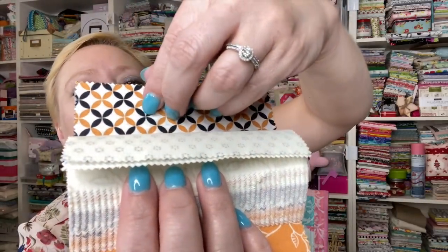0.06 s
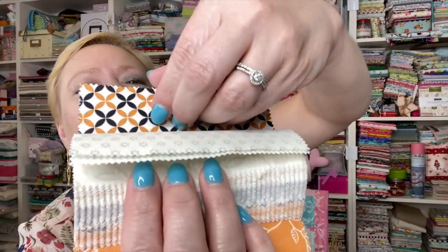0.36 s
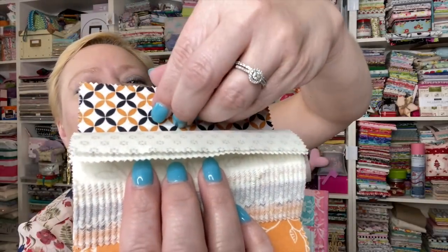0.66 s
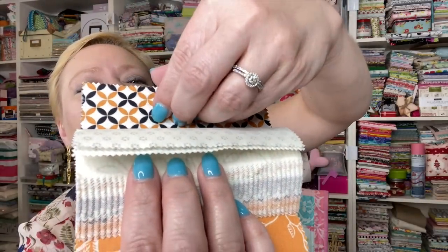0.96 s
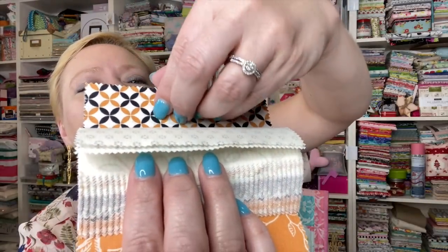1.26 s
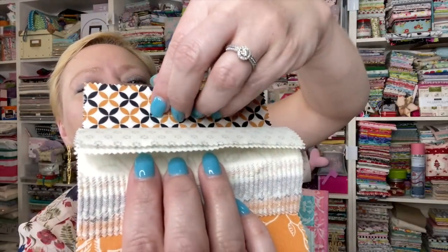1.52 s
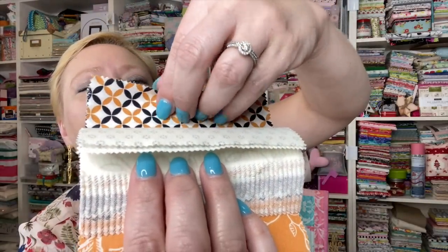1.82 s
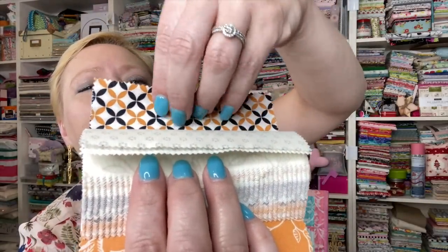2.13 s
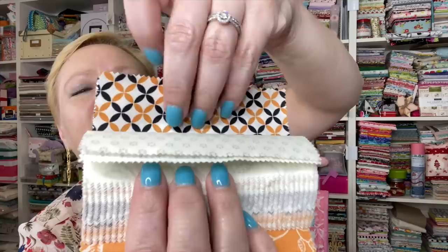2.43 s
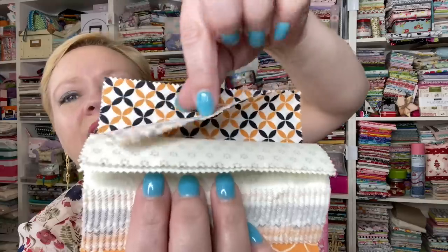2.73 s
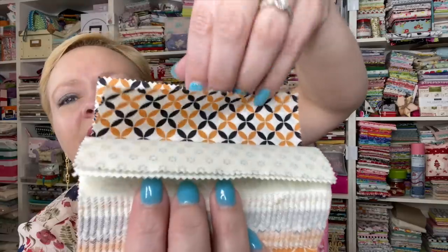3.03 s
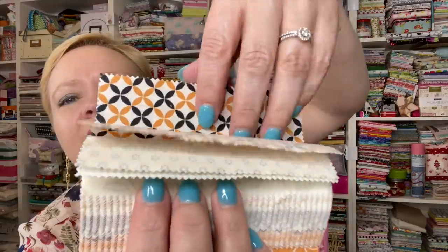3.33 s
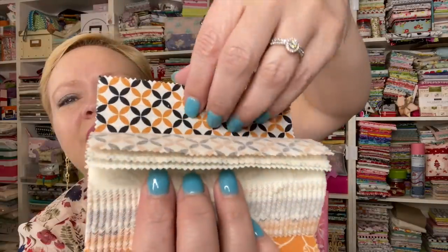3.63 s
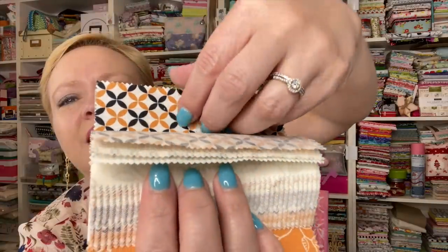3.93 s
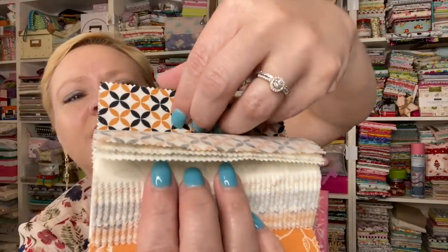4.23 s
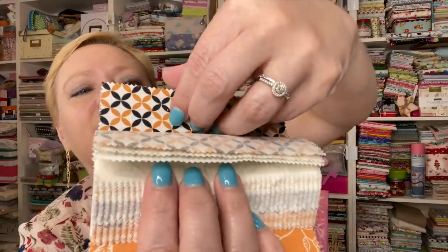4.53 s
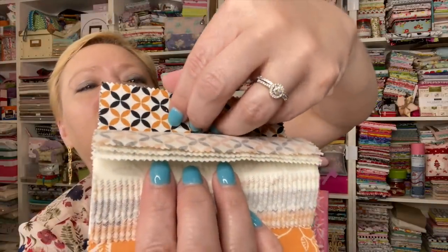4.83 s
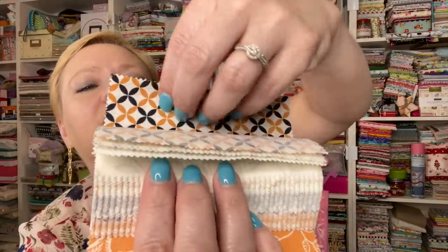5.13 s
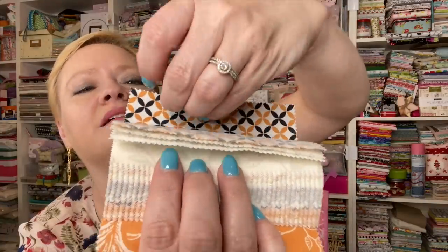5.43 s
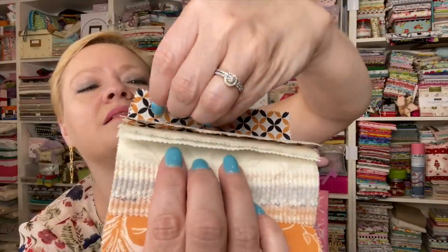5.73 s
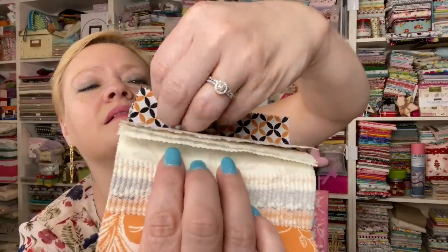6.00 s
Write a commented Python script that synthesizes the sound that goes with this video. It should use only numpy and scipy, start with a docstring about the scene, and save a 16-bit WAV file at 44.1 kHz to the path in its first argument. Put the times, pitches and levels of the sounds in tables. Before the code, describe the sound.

A small, dead-sounding room carries soft air noise, a low rumble, household machine hum, a fan throbbing about twice a second and a faint drone that slowly sinks in pitch. A soft, deep bump comes at about 0.4 seconds. Close to the stereo microphone and a little to the right, fingertips brush faintly over cotton squares, with a tiny tick at 1.6 seconds. From 2 seconds the strokes grow busier, mixing dull rubbing, bright hiss and light swishes. At about 3.2 seconds one square is folded over with the fullest swish and flops down softly. At 3.6 seconds a fingernail snaps off the edge of the stack, short and sharp, with a few soft taps. The cloth goes nearly still, apart from a thin tick at 4.8 seconds. Hissy brushes return around 5.2 to 5.4 seconds, and lighter rustles follow from 5.9 seconds to the end, just past 6.

```python
"""A small room padded with shelves of cloth, where cotton squares are leafed off a stack in close stereo.
Fingertips drag over the weave, and countless slipping threads make a dull rub, a bright hiss and a swish.
Edges catch and tick, one square is folded over and flops down, and a fingernail snaps off the stack's edge.
Underneath lie room air, rumble, one deep bump, the hum of household machines, a throbbing fan
and a faint drone that slowly sinks in pitch."""
import sys
import numpy as np
from scipy import signal
from scipy.fft import rfft, irfft
from scipy.io import wavfile
from scipy.ndimage import map_coordinates

SR = 44100
rng = np.random.default_rng(int(sys.argv[2]) if len(sys.argv) > 2 else 0)


def unload_wav(signal):
    """Save mono or channel-first audio to the path in sys.argv[1] as 16-bit WAV at rate SR, clipped to [-1, 1]."""
    wavfile.write(
        sys.argv[1],
        SR,
        np.round(np.clip(np.atleast_2d(signal).T, -1, 1) * 32767).astype(np.int16),
    )


N = 276066
TIME, FREQS = np.arange(N) / SR, np.arange(N // 2 + 1) * SR / N

# room tone of still air: freq_hz, gain_db
AIR_COLOUR = [(40, -11.5), (90, -8), (140, -1), (180, -7.5), (230, -9), (320, -20), (450, -27.5),
              (700, -34), (1200, -40.5), (2500, -46.5), (5000, -50.5), (8000, -49.5), (12000, -55.5),
              (15500, -53)]
# weight of the low rumble: freq_hz, gain_db
RUMBLE_COLOUR = [(15, -33), (25, -16), (38, 0), (52, 12.5), (68, 7), (85, 0.5), (120, 2.5), (200, -56),
                 (1000, -100)]
# surges in the rumble: peak_s, level_db, half_length_s
RUMBLE_SURGES = [(0.2, -35.5, 0.068), (1.06, -38, 0.12), (1.25, -36, 0.057), (2.45, -48, .05),
                 (2.95, -38.5, .08), (3.56, -47, 0.035), (3.96, -35, 0.047), (4.26, -37, 0.027),
                 (4.72, -47, 0.099), (5.2, -35, 0.017), (5.42, -39, 0.22)]
# level ride of the low-mid swell in the air: time_s, gain_db
SWELL_RIDE = [(0, -82), (0.8, -61), (1.15, -60), (2.4, -66), (3.3, -64), (4.1, -63.5), (4.7, -50),
              (5.1, -60.5), (5.85, -51.5), (6.26, -56.5)]
# tone of that swell: freq_hz, gain_db
SWELL_COLOUR = [(150, -17.5), (220, -0.5), (300, 4), (380, -5), (480, -19.5), (900, -43), (3000, -83)]
# notes of the machine hum: pitch_hz, level_db, waver_ratio
HUM_NOTES = [(52.35, -52.5, 0.42), (69.8, -47.5, 0.13), (120, -47, 0.36), (144.8, -52.5, 0.07)]
# level ride shared by the hum, the rumble bed and the bass of the air: time_s, gain_db
BASS_RIDE = [(0, -4.5), (0.2, -0.5), (0.55, -2), (0.7, 0.5), (1.0, 1), (1.4, -0.5), (1.75, -2.5),
             (1.92, -0.5), (2.15, 0), (2.4, -1.5), (3.0, -0.5), (3.3, 0), (3.7, 0), (4.3, 0.5),
             (4.55, -1.5), (4.95, 1.5), (5.12, -4.5), (5.3, -1.5), (5.55, 0), (5.8, 0), (6.26, -0.5)]
# the fan's blade note between dips: time_s, pitch_hz, level_db
FAN_NOTE = [(0, 99, -40.5), (1.5, 98, -38), (2.05, 96, -40.5), (2.6, 95, -36.5), (3.0, 95, -35.5),
            (3.6, 95, -35.5), (4.2, 96, -38), (5.3, 96, -41.5), (5.9, 96, -35.5), (6.26, 95, -34.5)]
# the fan's throb, about two dips a second: centre_s, depth_db, half_length_s
FAN_DIPS = [(0.332, 9.5, 0.035), (0.783, 13, 0.065), (1.237, 21, 0.085), (1.834, 26, 0.13),
            (2.333, 11.5, 0.14), (2.81, 13, 0.097), (3.266, 9, 0.16), (3.858, 8.5, 0.21),
            (4.512, 11.5, 0.11), (5.15, 14, 0.046), (5.625, 12, 0.06), (6.08, 10, 0.1)]
# level ride of the drone: time_s, level_db, octave_level_db
DRONE_RIDE = [(0, -54, -91), (0.75, -50, -83), (1.6, -49, -78), (4.1, -48, -80), (4.35, -47, -59.5),
              (4.8, -56, -57), (5.1, -51.5, -74.5), (6.26, -46.5, -64.5)]

# how alike the two channels are for far sounds: freq_hz, likeness_ratio
FAR_LIKENESS = [(25, 0.48), (60, 0.74), (120, 0.53), (250, 0.46), (500, 0.05), (1200, 0.027), (5500, 0.029),
                (7500, 0.43), (8700, 1), (16000, 1)]
# the same for close sounds: freq_hz, likeness_ratio
NEAR_LIKENESS = [(300, 0.82), (1300, 0.86), (2700, 0.21), (4200, 0.25), (6000, 0.056), (7500, 0.44),
                 (8700, 1), (16000, 0.99)]
# phase by which the left channel leads: freq_hz, lead_rad
LEFT_LEAD = [(0, 0), (1000, -.5), (2700, -2.8), (5500, -5.4), (7500, -4.4), (9300, -3.1), (10800, -.6),
             (12400, .3), (14600, 3.1), (16000, 4.1)]
# pan of the working hand: freq_hz, left_minus_right_db
HAND_PAN = [(200, -1), (500, -13), (900, -18.5), (1600, -5.5), (2500, -3), (3500, -8.5), (4800, -6),
            (6200, -5), (7400, 0.5), (10000, 0.5), (16000, -1)]

# ticks of nail and thread: start_s, level_db, centre_hz, width_hz, decay_s, tug_db, tug_hz
CATCHES = [(0.155, -60, 3000, 3500, 0.0045, -61, 1600), (1.629, -52.5, 2600, 2000, 0.0041, -56, 1150),
           (1.645, -57, 2500, 1800, .004, -69, 1600), (2.9175, -56, 6750, 6000, 0.012, -59.5, 900),
           (2.933, -59, 2500, 2000, 0.0028, -68, 1190), (3.233, -52, 3320, 1500, .0025, -68, 970),
           (4.818, -49.5, 12700, 3800, 0.0035, -66, 3900), (5.029, -60, 12000, 4000, 0.0017, -59, 1700)]
# soft blows on the stack: start_s, level_db, contact_s, ring_gain_db, left_minus_right_db
BLOWS = [(3.163, -40, 0.0036, -17, 4), (3.23, -35, 0.00143, -21.5, -14.5), (3.6435, -32.5, 0.0013, 1, 4),
         (3.662, -32, 0.0052, -11.5, 5), (3.672, -43.5, 0.0015, -9, 3), (3.685, -43, 0.0016, -9.5, 4)]
# modes of the struck stack and hand: pitch_hz, gain_db, t60_s
STACK_MODES = [(101, -1.5, 0.2), (215, -10, 0.11), (271.7, -13, 0.27), (401, 0, 0.067), (467, 2.5, 0.081),
               (556, -7.5, 0.1), (683, -9, 0.11), (821, 0.5, 0.072), (936, -1.5, 0.05), (1060, -11, 0.045),
               (1250, -11, 0.076), (1426, -9, 0.05), (2175, -3, 0.061), (2270, -9, 0.055),
               (2690, -11, 0.06), (2780, -14, 0.05), (3770, -13, 0.047)]
# tone of the wash after the snap: freq_hz, gain_db
SNAP_TAIL_COLOUR = [(100, 1), (450, 5), (900, 6.5), (1600, -1.5), (2800, -3.5), (4500, -11), (8000, -13.5),
                    (11000, -24), (16000, -20)]
# strokes of cloth on cloth: peak_s, rise_s, fall_s, rub_db, hiss_db, swish_db, swish_hz, swish_width_hz
STROKES = [ (0.008, 0.018, 0.016, -92, -84, -67, 1720, 90), (0.08, 0.021, 0.027, -83, -91, -76, 1680, 90),
           (0.652, 0.019, 0.019, -82, -80, -71, 2330, 1000),
           (1.362, 0.017, .028, -73, -73, -71, 4500, 2500),
           (1.644, 0.028, 0.019, -62, -77, -66.5, 2680, 2500),
           (2.0, 0.054, 0.095, -73, -77, -79.5, 2000, 2000),
           (2.245, 0.063, 0.079, -75, -70.5, -68, 1200, 700),
           (2.296, 0.0068, 0.012, -57, -65, -76, 2520, 900),
           (2.329, 0.025, 0.04, -68, -65, -64.5, 1400, 1180), (2.465, 0.039, 0.04, -70, -71, -68, 816, 200),
           (2.485, 0.03, 0.013, -61, -62, -61, 3370, 500),
           (2.546, 0.013, 0.022, -65, -62.5, -66.5, 3630, 800),
           (2.592, 0.012, 0.014, -66, -72, -67.5, 3550, 500),
           (2.688, 0.036, 0.023, -68, -62, -69.5, 3930, 1500),
           (2.974, 0.04, 0.12, -69, -69, -63.5, 5700, 3000),
           (3.1, 0.089, 0.035, -67, -65.5, -64, 2230, 1400),
           (3.142, 0.011, 0.021, -56, -64, -61, 2560, 900),
           (3.175, 0.048, 0.041, -50, -48.5, -51, 1000, 1350),
           (3.385, 0.047, 0.025, -64.5, -67.5, -66.5, 2930, 2950),
           (3.59, 0.043, 0.074, -66, -64, -65, 2880, 1500), (4.55, 0.12, 0.28, -76.5, -91, -86, 2300, 1790),
           (5.04, 0.015, 0.14, -69, -75.5, -82, 1700, 1200),
           (5.226, 0.032, 0.057, -64.5, -55.5, -65.5, 1540, 930),
           (5.356, 0.023, 0.022, -64, -49.5, -61.5, 1300, 800),
           (5.394, 0.026, 0.022, -60, -57, -65, 1400, 1390), (5.66, 0.047, .03, -88, -86, -70, 1390, 960),
           (5.765, 0.016, 0.027, -79, -76, -88, 2500, 2000),
           (5.911, 0.029, 0.025, -61.5, -58, -62, 855, 500),
           (6.148, 0.034, 0.024, -63.5, -65, -71.5, 2000, 2000),
           (6.25, 0.033, 0.024, -75, -72, -65, 900, 880), ]
# a held square creeps between the fingers: start_s, end_s
HOLDS = [(2.17, 3.66), (5.7, 5.9)]
# dull body of the friction: freq_hz, gain_db
RUB_COLOUR = [(120, -13), (300, 18), (520, 13.5), (850, 6), (1300, 6), (1950, 5.5), (2600, 6), (3200, 0),
              (4000, -9), (5200, -31), (7500, -16), (11000, -46), (16000, -53)]
# bright top of the friction: freq_hz, gain_db
HISS_COLOUR = [(1500, -39), (4000, -33), (4900, -15), (6300, -10.5), (7700, -5), (9500, -12), (11800, -4.5),
               (14000, -6), (15500, 0.5), (17000, -24)]
# narrow peak in the hiss that shifts with the grip: time_s, centre_hz, relative_to_hiss_db
HISS_PEAK = [(1.4, 7500, -14), (2.3, 7740, -8), (2.48, 7940, -10), (2.69, 7860, -1), (3.0, 7360, -5),
             (3.2, 7600, -18), (5.22, 7450, -19), (5.37, 7600, -6), (5.91, 6840, -9), (6.15, 7700, -3)]

SNAP_START_S, SNAP_DB = 3.6409, -30


def from_db(db):
    """Decibels to gain."""
    return 10 ** (np.asarray(db) / 20)


def rms_one(x):
    """Scale to unit rms."""
    return x / np.sqrt(np.mean(x ** 2) + 1e-20)


def in_time(rows):
    """The columns of an automation curve at every sample."""
    times, *columns = np.transpose(rows)
    return [np.interp(TIME, times, column) for column in columns]


def over_hz(points):
    """An EQ-style curve: straight lines on a log-frequency axis."""
    hz, value = np.transpose(points)
    return np.interp(np.log(FREQS + 1), np.log(hz), value)


def coloured(x, colour):
    """EQ a flat sound; rms 1."""
    return rms_one(irfft(rfft(x) * from_db(over_hz(colour)), N))


def noise(colour):
    """Two unrelated channels of coloured noise; rms 1."""
    return coloured(rng.standard_normal((2, N)), colour)


def drift(rate_hz):
    """A slow random wobble; rms 1."""
    return rms_one(irfft(rfft(rng.standard_normal(N)) / (1 + (FREQS / rate_hz) ** 2), N))


def swell_and_fade(peak_s, rise_s, fall_s, roundness=1.37):
    """An envelope peaking at 1; roundness 1 gives a cusp, 2 a bell."""
    away = np.maximum((peak_s - TIME) / rise_s, (TIME - peak_s) / fall_s)
    return np.exp(-np.minimum(away ** roundness, 20))


def low_pass(x, hz):
    """A gentle one-pole roll-off."""
    pole = np.exp(-2 * np.pi * hz / SR)
    return signal.lfilter([1 - pole], [1, -pole], x + 1e-18)


def resonance(x, hz, width_hz):
    """A two-pole band-pass that keeps the power of white noise."""
    radius = np.exp(-np.pi * width_hz / SR)
    feedback = [1, -2 * radius * np.cos(2 * np.pi * hz / SR), radius ** 2]
    return signal.lfilter(np.sqrt((1 - radius ** 2) / 2) * np.array([1, 0, -1]), feedback, x + 1e-18)


def moving_resonance(x, hz, width_hz):
    """A swept band-pass; rms 1."""
    carrier = np.exp(2j * np.pi * np.cumsum(hz) / SR)
    return rms_one(np.real(carrier * low_pass(low_pass(x / carrier, width_hz / 2), width_hz / 2)))


def ring(x, hz, t60_s):
    """A unit click sets a sine of height 1 ringing."""
    radius, angle = from_db(-60 / (t60_s * SR)), 2 * np.pi * hz / SR
    return signal.lfilter([0, np.sin(angle)], [1, -2 * radius * np.cos(angle), radius ** 2], x + 1e-18)


def tone(hz, level_db, waver):
    """A sine whose strength and phase wander by the amount of waver."""
    phase = 2 * np.pi * (np.cumsum(hz * np.ones(N)) / SR + rng.random())
    wander = (1 + waver * (drift(3.6) + 1j * drift(3.0))) / np.sqrt(1 + 2 * waver ** 2)
    return np.sqrt(2) * from_db(level_db) * np.real(wander * np.exp(1j * phase))


def stereo(x, likeness=FAR_LIKENESS):
    """Two unrelated channels become a microphone pair, partly alike and staggered in phase."""
    alike = np.clip(over_hz(likeness), 0, 1)
    mid, side = rfft(x) * np.sqrt([(1 + alike) / 2, (1 - alike) / 2])
    lag = np.exp(-1j * np.interp(FREQS, *np.transpose(LEFT_LEAD)))
    return irfft(np.array([mid + side, (mid - side) * lag]), N)


def room_air(bass_ride, level_db=-46.0, bass_top_hz=260):
    """Soft room tone whose low end breathes with the hum."""
    air = from_db(level_db) * noise(AIR_COLOUR)
    bass = signal.sosfiltfilt(signal.butter(2, bass_top_hz, fs=SR, output="sos"), air)
    return air + (bass_ride - 1) * bass


def rumble(bass_ride, bed_db=-46):
    """A bed of deep noise with a few surges on top."""
    surge_power = sum((from_db(level_db) * swell_and_fade(peak_s, half_s, half_s)) ** 2
                      for peak_s, level_db, half_s in RUMBLE_SURGES)
    return np.sqrt((bass_ride * from_db(bed_db)) ** 2 + surge_power) * noise(RUMBLE_COLOUR)


def air_swell(trim_db=-0.5):
    """The air swells and settles in the low mids."""
    return from_db(in_time(SWELL_RIDE)[0] + trim_db) * noise(SWELL_COLOUR)


def machine_hum(bass_ride):
    """Household machines hold a cluster of low, wavering notes."""
    return bass_ride * sum(tone(hz, level_db, waver) for hz, level_db, waver in HUM_NOTES)


def fan():
    """The blade note drifts a little in pitch and throbs."""
    hz, level_db = in_time(FAN_NOTE)
    dips_db = sum(depth_db * swell_and_fade(at_s, half_s, half_s) for at_s, depth_db, half_s in FAN_DIPS)
    return tone(hz, level_db - dips_db, waver=0.048)


def drone(start_hz=190.2, sag_hz_per_s=2.42, waver=0.2, roughness=0.45):
    """A faint note and its rough octave sink evenly in pitch."""
    hz = start_hz - sag_hz_per_s * TIME
    level_db, octave_db = in_time(DRONE_RIDE)
    return tone(hz, level_db, waver) + tone(2 * hz, octave_db, waver) * (1 + roughness * drift(17))


def bump(peak_s=0.372, half_s=0.036):
    """A few cycles of deep bass that swell and fade."""
    return tone(hz=49, level_db=-31, waver=0) * swell_and_fade(peak_s, half_s, half_s)


def background(heave_db=1.0):
    """The ambience bed: wide, gently heaving noise around centred tones."""
    bass_ride = from_db(in_time(BASS_RIDE)[0])
    air, lows, low_mids = room_air(bass_ride), rumble(bass_ride), air_swell()
    tones = machine_hum(bass_ride) + fan() + drone()
    lows *= from_db(heave_db * drift(7.5))
    low_mids *= from_db(heave_db * drift(7.4))
    return stereo(air + lows + low_mids) + tones + bump()


def room_reverb(x, predelay_s=0.0018, dull_hz=3320, t60_s=0.16, bright_t60_s=0.13, bright_db=-5.0):
    """A short tail, different on each side; the cloth all around swallows the treble first."""
    age = TIME[:SR // 2]
    dull, bright = rng.standard_normal((2, 2, len(age)))
    dull = rms_one(low_pass(low_pass(dull, dull_hz), dull_hz)) * from_db(-60 * age / t60_s)
    bright = from_db(bright_db) * bright * from_db(-60 * age / bright_t60_s)
    tail = (dull + bright) * (age > predelay_s)
    return signal.fftconvolve(x, tail / np.sqrt(np.sum(tail ** 2) / 2), axes=1)[:, :N]


def hand_bounce(x, delay_s=0.000768, travel=0.247, bounce_db=-12.0):
    """Part of the rustle bounces off the moving hand: a slowly shifting comb filter."""
    earlier_s = TIME - delay_s * np.exp(travel * drift(1.84))
    channel_starts = [[0], [N]]
    return x + from_db(bounce_db) * map_coordinates(x.ravel(), [earlier_s * SR + channel_starts], order=3)


def pan_to_hand(x):
    """The working hand is on the right, which the mids show most."""
    return irfft(rfft(x) * from_db(over_hz(HAND_PAN) * [[.5], [-.5]]), N)


def slips(per_s, spread_db):
    """The grain of friction: threads catch and let go at random, with uneven sizes; rms 1."""
    slipping = rng.random(N) < per_s / SR
    sizes = from_db(spread_db * np.minimum(rng.exponential(1, N), 4))
    return rms_one(slipping * sizes * rng.standard_normal((2, N)))


def restless_fingers(level_db=-78.0, hz=1600, width_hz=2000, unrest_db=2.5):
    """The fingertips never rest: their faint, broad friction comes and goes."""
    friction = slips(per_s=5000, spread_db=2.0)
    band = rms_one(resonance(resonance(friction, hz, width_hz), hz, width_hz))
    return from_db(level_db + unrest_db * np.tanh(drift(3.1))) * band


def catches(attack_s=0.0007, tug_width_hz=650):
    """A nail or stiff edge holds, then lets go in a tiny tick that also tugs the sheet."""
    out = np.zeros((2, N))
    age = TIME[:SR // 8]
    for start_s, level_db, hz, width_hz, decay_s, tug_db, tug_hz in CATCHES:
        envelope = np.exp(-age / decay_s) * (1 - np.exp(-age / attack_s))
        tick_burst, tug_burst = rng.standard_normal((2, 2, len(age))) * envelope
        tick = from_db(level_db) * resonance(tick_burst, hz, width_hz)
        tug = from_db(tug_db) * resonance(tug_burst, tug_hz, tug_width_hz)
        at = round(start_s * SR)
        out[:, at:at + len(age)] += tick + tug
    return out


def blows():
    """Each soft blow pushes out one puff of air and sets the stack ringing briefly."""
    puffs, clicks = np.zeros((2, 2, N))
    for start_s, level_db, contact_s, ring_db, pan_db in BLOWS:
        progress = (TIME - start_s) / contact_s
        strength = from_db(level_db + pan_db * np.array([.5, -.5]))
        puffs += strength[:, None] * np.sin(2 * np.pi * progress) * (progress > 0) * (progress < 1)
        clicks[:, round(start_s * SR)] = strength * from_db(ring_db)
    left, right = puffs
    for k, (hz, gain_db, t60_s) in enumerate(STACK_MODES):
        near, far = (-1) ** k * from_db(gain_db) * ring(clicks, hz, t60_s)
        delay_s = rng.uniform(.00015, .00035)   # each mode radiates in its own direction
        left += near
        right += np.interp(TIME - delay_s, TIME, far)
    return np.array([left, right])


def snap_tail(relative_db=-5.0, t60_s=0.16, build_s=0.0037):
    """The shelves scatter the snap into a smooth, duller wash that dies quickly."""
    age = np.maximum(TIME - SNAP_START_S, 0)
    envelope = np.minimum(age / build_s, 1) * from_db(-60 * np.clip(age - build_s, 0, 1) / t60_s)
    return from_db(SNAP_DB + relative_db) * envelope * noise(SNAP_TAIL_COLOUR)


def nail_snap(bright_hz=7000, attack_s=0.00086, length_s=0.005, release_s=0.002):
    """The nail rakes the layered, pinked edges: slips so dense that they fuse into one noise burst."""
    age = TIME - SNAP_START_S
    envelope = np.clip(age / attack_s, 0, 1) * np.exp(-np.maximum(age - length_s, 0) / release_s)
    return from_db(SNAP_DB) * envelope * rms_one(low_pass(rng.standard_normal((2, N)), bright_hz))


def swishes(speeds):
    """Each stroke's friction sounds through one broad resonance, set by the gap between hand and sheet."""
    out = np.zeros((2, N))
    friction = slips(per_s=5000, spread_db=2.0)
    for speed, (*_, level_db, hz, width_hz) in zip(speeds, STROKES):
        band = resonance(resonance(friction, hz, 2 * width_hz), hz, 2 * width_hz)
        out += from_db(level_db) * speed * rms_one(band)
    return out


def cloth_friction(speeds, creep_rub_db=-73, creep_hiss_db=-78, creep_fade_s=0.12, judder_db=1.55):
    """Threads slip under each stroke and creep while held; uneven drag flutters rub and hiss together."""
    held = sum(np.clip(np.minimum(TIME - start_s, end_s - TIME) / creep_fade_s + .5, 0, 1)
               for start_s, end_s in HOLDS)
    creep = from_db([[creep_rub_db], [creep_hiss_db]]) * held
    _, _, _, rub_db, hiss_db, *_ = np.transpose(STROKES)
    rub_gain, hiss_gain = np.sqrt(from_db([rub_db, hiss_db]) ** 2 @ speeds ** 2 + creep ** 2)
    coarse, fine = slips(per_s=6000, spread_db=1.9), slips(per_s=11000, spread_db=1.8)
    peak_hz, peak_db = in_time(HISS_PEAK)
    peak = moving_resonance(slips(per_s=16000, spread_db=1.6), peak_hz, width_hz=1300)
    rub = rub_gain * coloured(coarse, RUB_COLOUR)
    hiss = hiss_gain * (coloured(fine, HISS_COLOUR) + from_db(peak_db) * peak)
    return (rub + hiss) * from_db(judder_db * drift(37))


def scene(rustle_send_db=-15.5, tick_send_db=-5.5, knock_send_db=-15.5):
    """The mix: cloth and fingers up front, a little dead room around them, the ambience underneath."""
    speeds = np.array([swell_and_fade(peak_s, rise_s, fall_s) for peak_s, rise_s, fall_s, *_ in STROKES])
    rustle = hand_bounce(cloth_friction(speeds) + swishes(speeds) + restless_fingers())
    ticks, snap, knocks = catches(), nail_snap(), blows()
    send = from_db(rustle_send_db) * rustle + from_db(tick_send_db) * ticks + from_db(knock_send_db) * knocks
    tails = room_reverb(send) + snap_tail()
    close = pan_to_hand(stereo(rustle + ticks, NEAR_LIKENESS)) + stereo(snap, NEAR_LIKENESS) + knocks
    return close + stereo(tails) + background()


def record(dry, cutoff_hz=15900):
    """A steep high cut on the whole mix."""
    return signal.sosfilt(signal.ellip(10, .1, 80, cutoff_hz, fs=SR, output="sos"), dry)


dry = scene()
out = record(dry)
unload_wav(out)
```